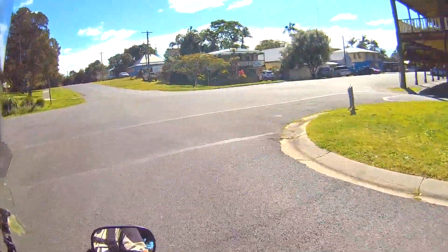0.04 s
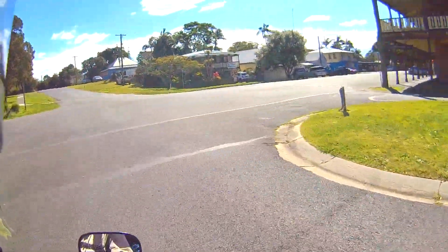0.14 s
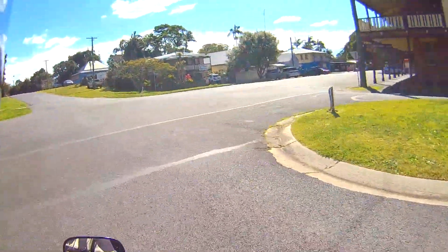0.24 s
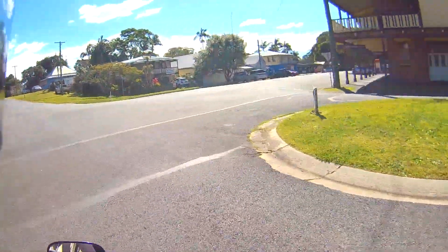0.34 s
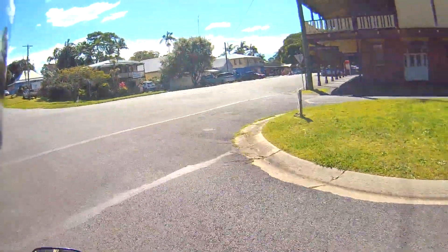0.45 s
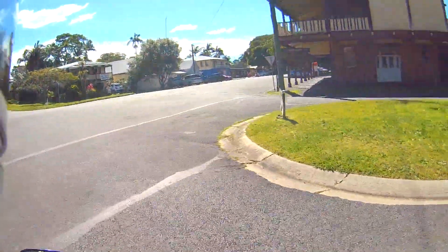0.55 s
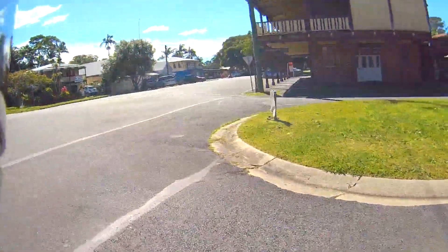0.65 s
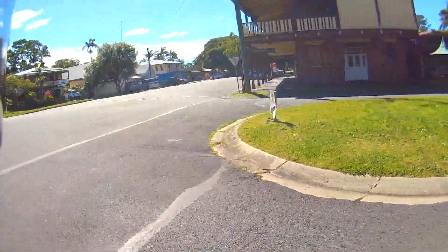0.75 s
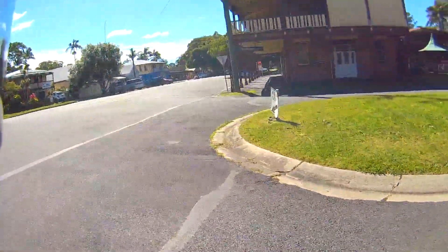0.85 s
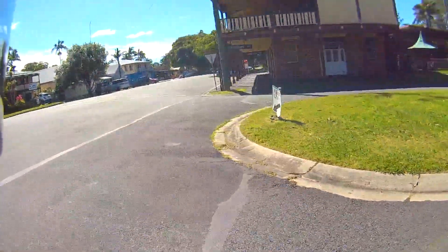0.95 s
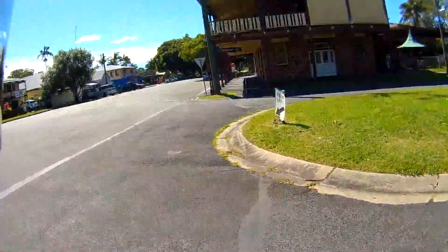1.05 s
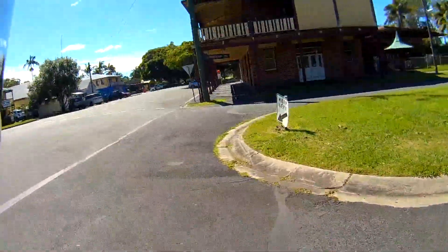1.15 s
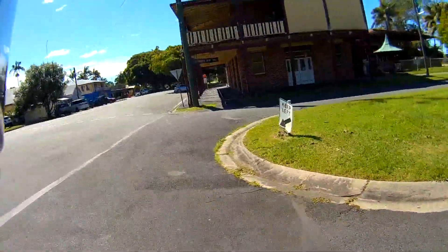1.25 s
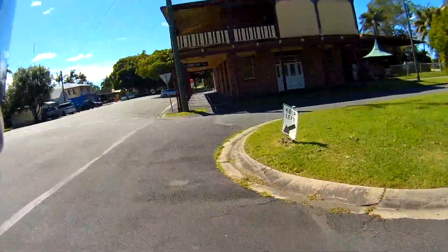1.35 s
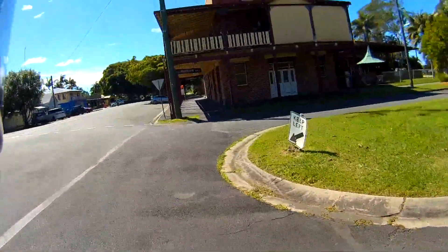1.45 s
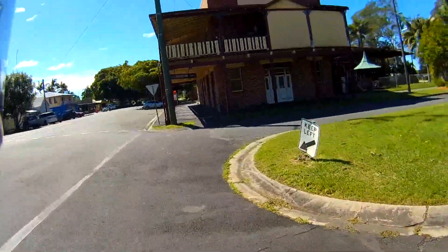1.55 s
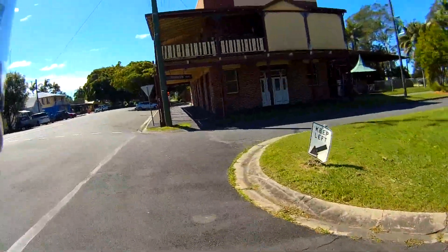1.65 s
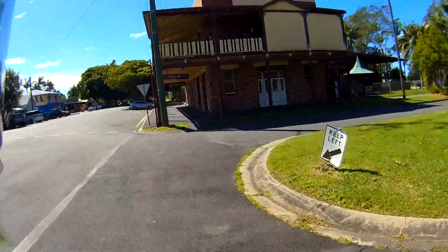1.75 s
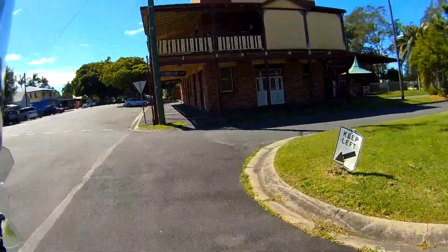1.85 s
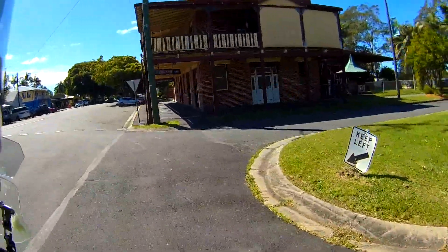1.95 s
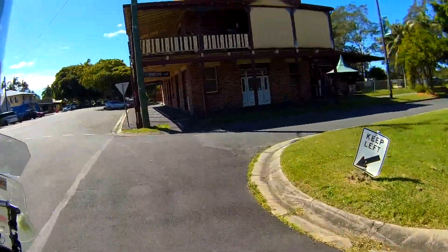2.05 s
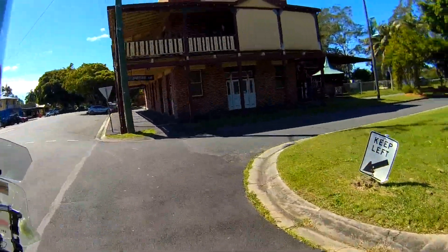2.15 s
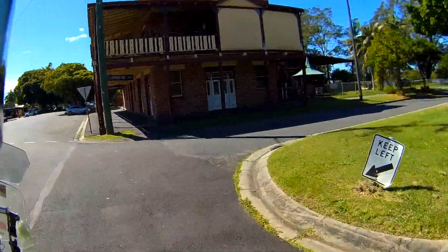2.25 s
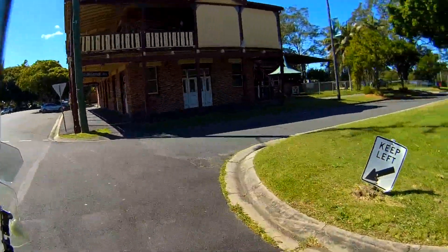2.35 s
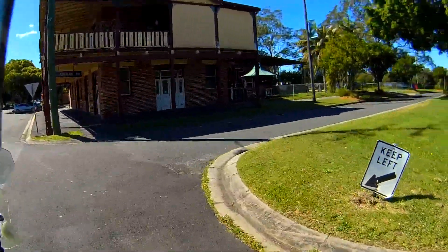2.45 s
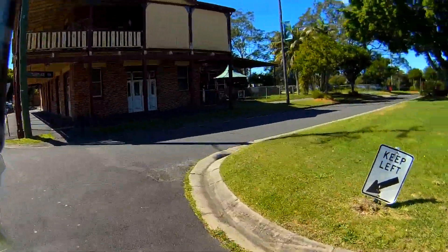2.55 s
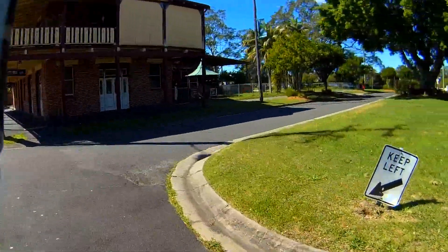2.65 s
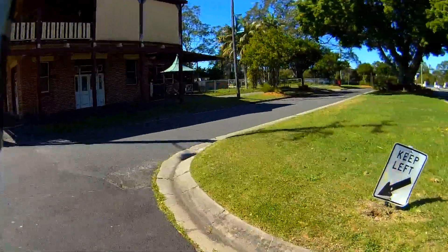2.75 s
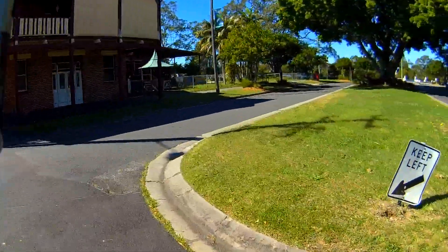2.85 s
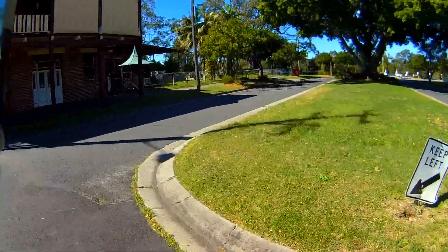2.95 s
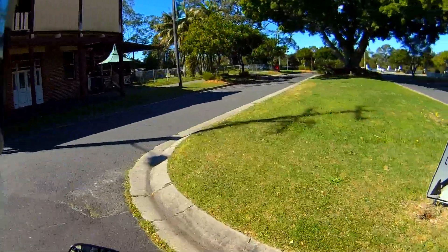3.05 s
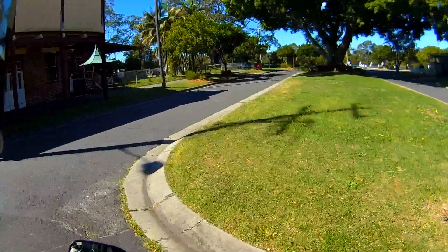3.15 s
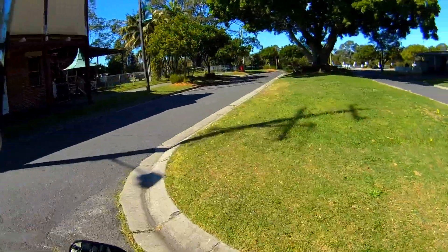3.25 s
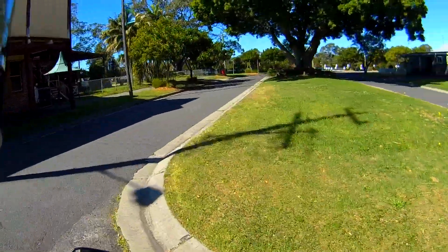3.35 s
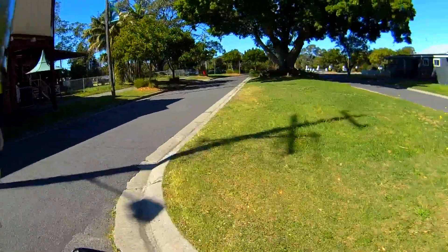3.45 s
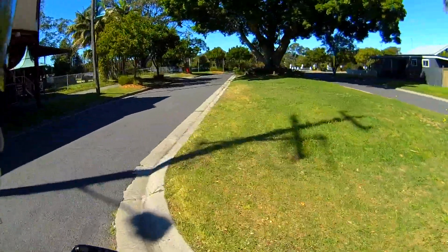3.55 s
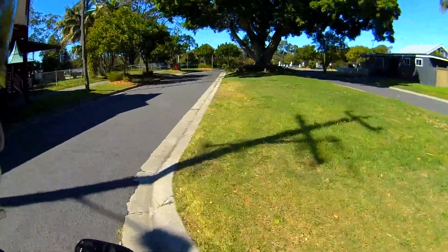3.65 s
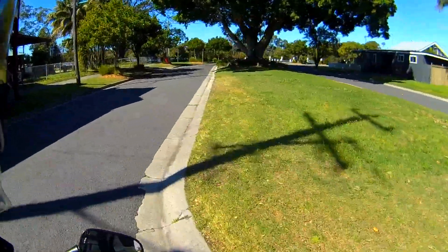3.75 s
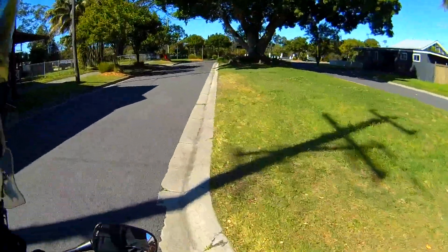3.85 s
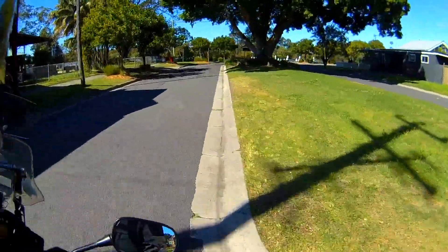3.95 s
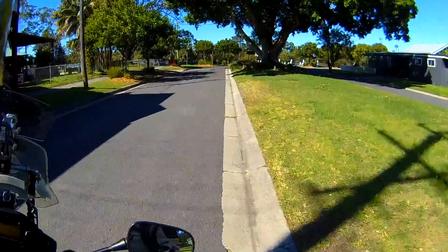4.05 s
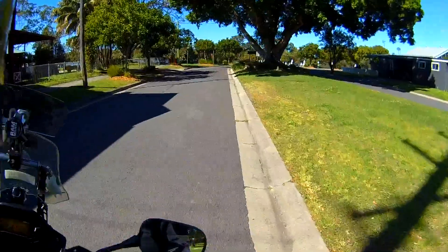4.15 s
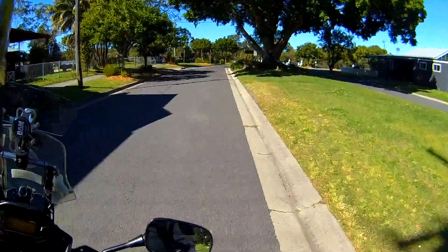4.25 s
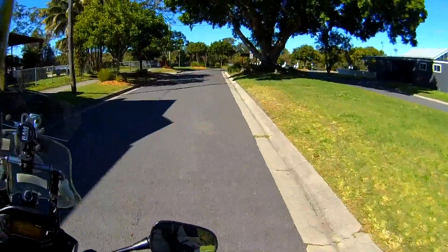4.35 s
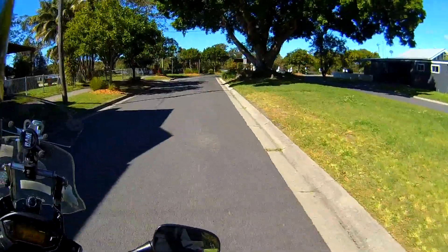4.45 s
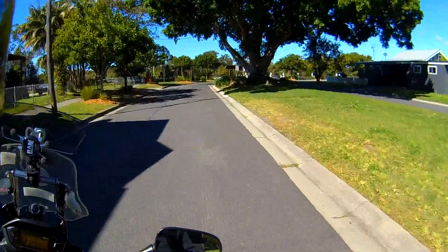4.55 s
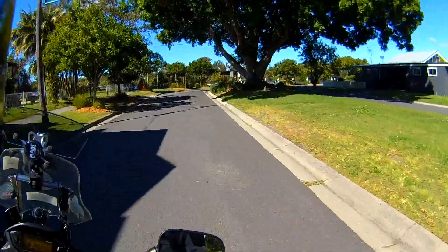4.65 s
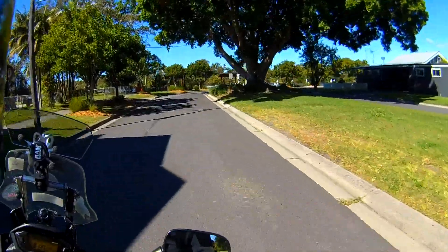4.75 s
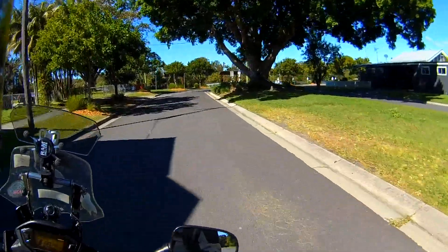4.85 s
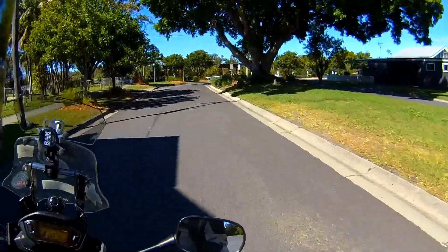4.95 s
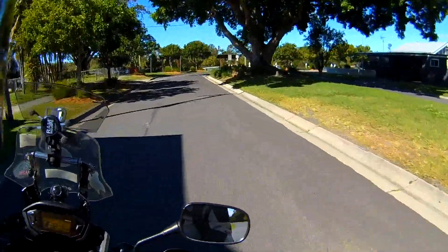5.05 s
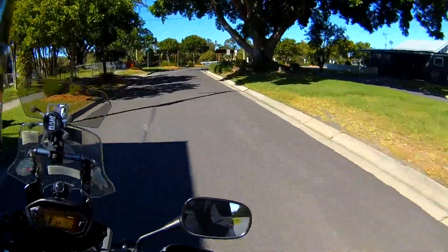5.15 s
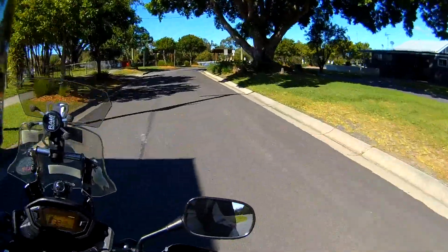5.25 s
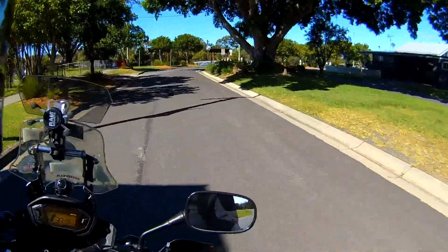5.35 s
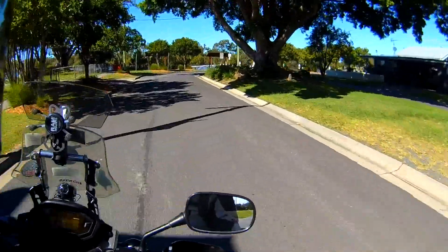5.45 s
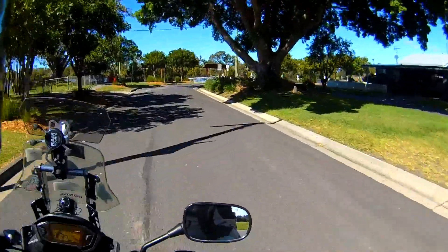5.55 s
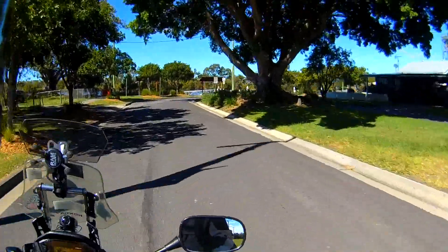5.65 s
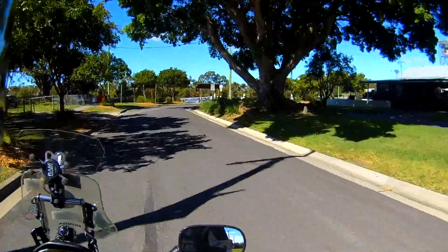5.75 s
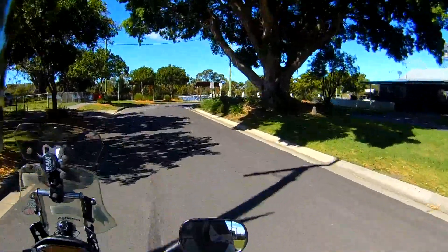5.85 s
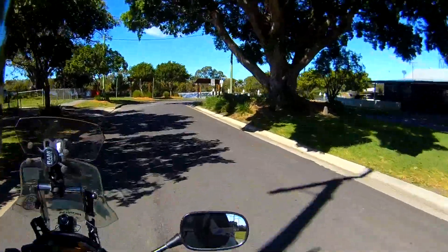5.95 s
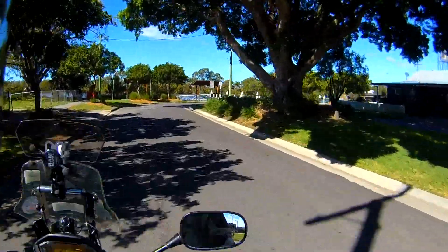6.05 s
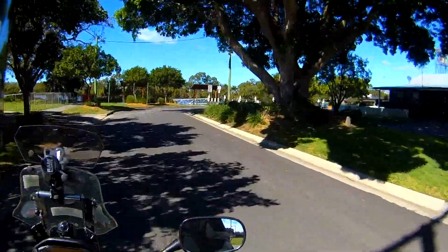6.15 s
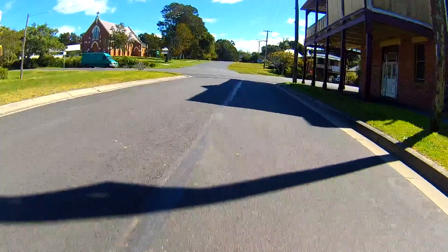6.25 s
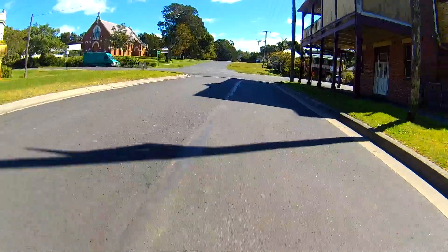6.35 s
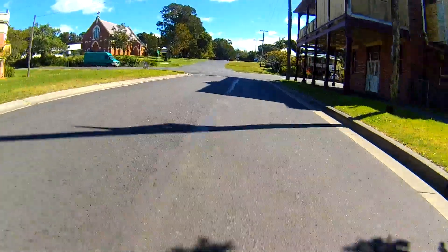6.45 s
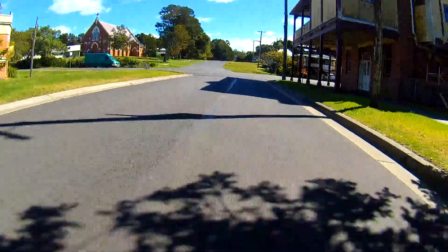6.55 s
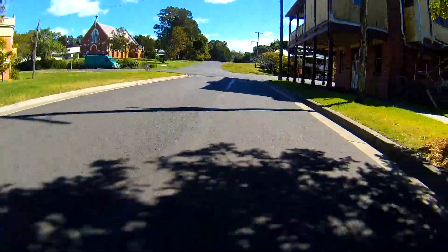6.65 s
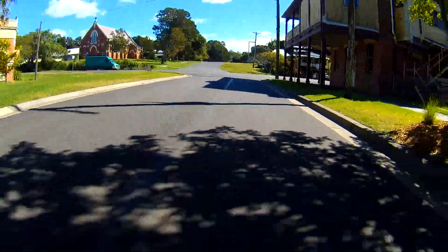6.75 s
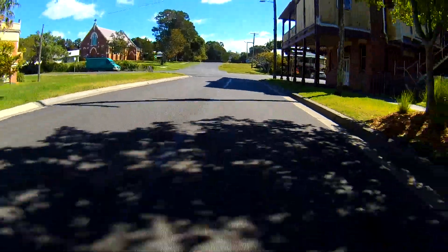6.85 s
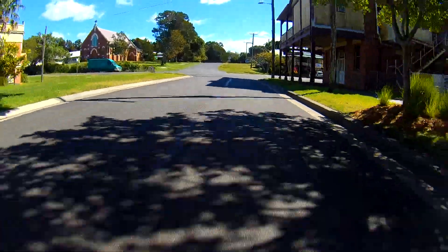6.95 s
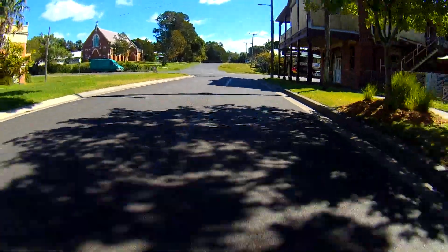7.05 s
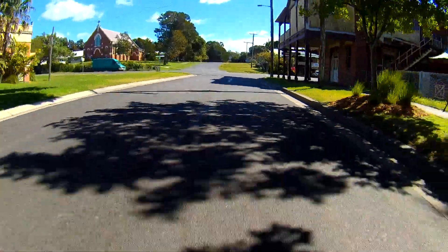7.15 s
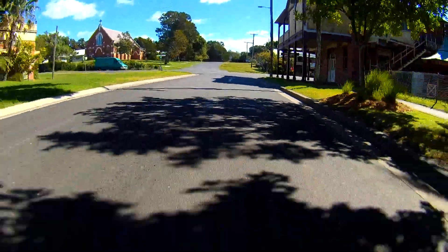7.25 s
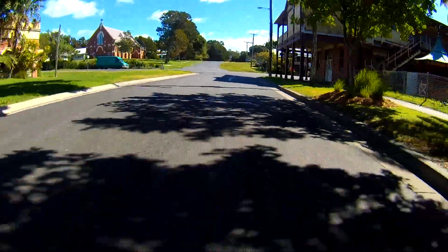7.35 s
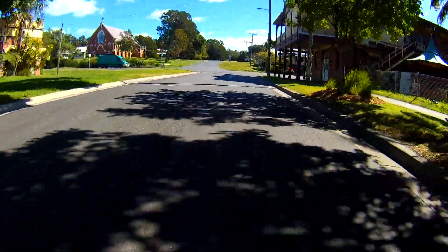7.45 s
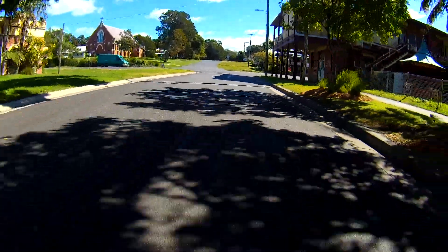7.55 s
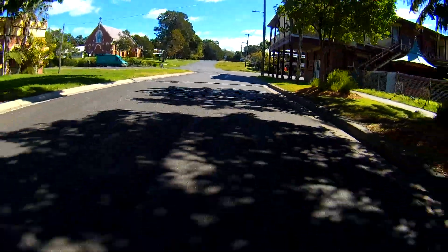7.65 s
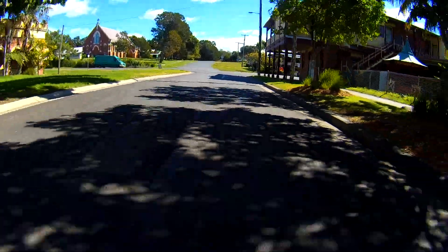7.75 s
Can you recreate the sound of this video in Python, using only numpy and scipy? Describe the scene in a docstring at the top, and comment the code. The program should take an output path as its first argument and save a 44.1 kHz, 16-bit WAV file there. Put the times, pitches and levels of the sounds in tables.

```python
"""A twin-cylinder motorcycle heard from the rider's helmet: it idles round a corner, valves clattering and gears
whining over the wind's rumble; two gulps a quarter cycle apart excite the airbox, silencer and pipe.
It pulls away with a harmonic blare, whistling past the throttle plates, then eases the throttle back.
A cut leads to a second, louder shot, in which it slows: a loose panel buzzes and snaps, and dull thuds follow.
Pulse trains and noise locked to one crank phase pass through resonant bodies; sines make the pure tones."""
import sys
import numpy as np
from scipy import signal
from scipy.fft import rfft, irfft, next_fast_len
from scipy.io import wavfile
from scipy.ndimage import uniform_filter1d, map_coordinates

SR = 44100
rng = np.random.default_rng(int(sys.argv[2]) if len(sys.argv) > 2 else 0)


def wav_record(signal):
    """Record a signal, one row per channel, as 16-bit PCM in the file named by sys.argv[1]."""
    frames = np.transpose(np.atleast_2d(signal))
    bounded = np.clip(frames, -1, 1)
    # unit amplitude maps onto the largest positive 16-bit level
    quanta = np.round(bounded * 32767).astype(np.int16)
    wavfile.write(sys.argv[1], SR, quanta)


N = 343539
TIME = np.arange(N) / SR
CUT_S = 6.29  # the cut to a second, louder shot
REFERENCE_RATE = 20  # four-stroke cycles a second at which speed adds no gain


def amp(db):
    """Level: 20 dB is a tenfold amplitude."""
    return 10 ** (np.asarray(db) / 20)


def unit(x):
    """Normalisation: scale to rms 1."""
    return x / np.sqrt(np.mean(x ** 2) + 1e-20)


def steady(x):
    """Running normalisation: hold the short-term rms near 1 over several engine cycles."""
    power = uniform_filter1d(uniform_filter1d(x ** 2, size=SR // 5), size=SR // 7)
    return x / np.sqrt(np.abs(power) + 1e-6 * np.mean(x ** 2))


def curves(rows, at=TIME):
    """Linear interpolation in time of each column after the first."""
    s, *cols = np.transpose(rows)
    return [np.interp(at, s, c) for c in cols]


def wobble(rate):
    """Band-limited random modulation: a spline through rate random knots a second."""
    knots = rng.standard_normal(int(N * rate / SR) + 4)
    return map_coordinates(knots, [TIME * rate])


def noise():
    """White noise: equal mean power at every frequency."""
    return rng.standard_normal(N)


def impulses(times, sizes):
    """Impulse excitation: one spike at each time."""
    inside = (times > 0) & (times < TIME[-1])
    samples = np.round(times[inside] * SR).astype(int)
    return np.bincount(samples, sizes[inside], N)


def lobe(turn, centre, sharp):
    """Periodic modulation: a smooth bump once per turn, top 1."""
    return np.exp(sharp * (np.cos(2 * np.pi * (turn - centre)) - 1))


def filtered(x, response):
    """Linear filtering: multiply the spectrum by a response of frequency."""
    m = next_fast_len(N + SR // 2)
    return irfft(rfft(x, m) * response(np.fft.rfftfreq(m, 1 / SR)), m)[:N]


def contour(points, hz):
    """Frequency response: gain from (Hz, dB) points, in dB over log frequency."""
    f, db = np.transpose(points)
    return amp(np.interp(np.log(hz + 1), np.log(f), db))


def ring(x, points, size=16384):
    """Minimum-phase resonance: a causal body whose gain follows (Hz, dB) points."""
    hz = np.fft.rfftfreq(size, 1 / SR)
    low_hz, high_hz = points[0][0], points[-1][0]
    gain = contour(points, hz)
    # roll off an octave outside the given points
    gain = gain / np.sqrt(1 + (low_hz / (hz + 1) / 2) ** 4) / (1 + (hz / high_hz / 2) ** 4)
    # folding the cepstrum to positive time gives the causal phase
    cepstrum = irfft(np.log(np.maximum(gain, 1e-6)))
    cepstrum[1:size // 2] *= 2
    cepstrum[size // 2 + 1:] = 0
    return signal.fftconvolve(x, irfft(np.exp(rfft(cepstrum))))[:N]


def resonance(hz, centre_hz, width_hz):
    """Forced resonance: gain of a part shaken near its own pitch, top 1."""
    return 1 / np.sqrt(1 + ((hz - centre_hz) / width_hz) ** 2)


def speed(at=TIME):
    """Rotation rate: four-stroke engine cycles a second, the derivative of the crank phase."""
    # Engine speed. Each row: time in seconds, rate in cycles a second.
    speed_rows = [(0, 20.05), (.2, 16.91), (.7, 15.1), (.9, 15.47), (1.3, 9.24), (1.48, 10.46),
                  (1.7, 18.84), (1.87, 21.15), (2.25, 18.7), (2.88, 17.08), (3.04, 14.7), (3.41, 15.34),
                  (4.18, 18.77), (5.48, 31.83), (5.6, 28.28), (5.77, 30.91), (6.08, 30.4), (6.25, 26.3),
                  (6.48, 28.05), (6.75, 25.85), (7.79, 20.4)]
    return curves(speed_rows, at)[0]


def throttle():
    """Control of air flow: how far the throttle is open, 0-1."""
    # The rider's wrist. Each row: time in seconds, opening from 0 to 1.
    throttle_rows = [(0, 0.47), (.55, 0.34), (.95, 0.17), (1.6, 0.28), (1.9, 0.05), (2.8, 0.15),
                     (3.1, 0.46), (4.1, 0.61), (4.4, 0.92), (5.48, 0.92), (5.57, 0.53), (6.27, 0.52),
                     (6.9, 0.98), (7.6, 0.4)]
    return np.clip(curves(throttle_rows)[0], 0, 1)


def pulling(at=TIME):
    """Load state: 1 while the engine drives the bike, 0 while it idles or coasts."""
    from_s, to_s, clutch_s = 1.5, 5.55, 0.12
    return np.clip(np.minimum(at - from_s, to_s - at) / clutch_s + .5, 0, 1)


def effort(base_db, octave_db, throttle_db, late_db):
    """Source strength: dB add up for each doubling of speed, for throttle and after the cut."""
    speed_db = octave_db * np.log2(speed() / REFERENCE_RATE)
    return amp(base_db + speed_db + throttle_db * throttle() + late_db * (TIME > CUT_S))


def firings(cycle, second_db=4.0):
    """Pulse-train source: two gulps about a quarter cycle apart, then a rest; even under pull, else uneven."""
    gap_pulling, gap_coasting = 0.228, 0.2582  # cycles
    scatter_db, scatter_s = .7, 0.0005
    pull_steadies = .86  # share of the scatter, and of the second gulp's extra dB, lost under pull
    lug_scatter, lug_below_rate = .4, 21.5  # pulling at low revs: share of scatter added, cycles a second
    stumble_spread = 0.008  # a weak pair drifts apart: cycles per dB of drop
    # Stumbles while coasting. Each row: time in seconds, change of strength in dB.
    stumble_rows = [(.11, -4), (.34, -7), (.46, -4), (.79, -4), (1.14, -6), (6.395, -3), (6.54, -3.5),
                    (6.69, -2.5), (6.81, -3.5), (6.847, -4), (6.925, -4.5), (7.04, -3.5), (7.17, -8),
                    (7.3, -7), (7.39, -3.5), (7.575, -5), (7.67, -6)]
    count = np.arange(int(cycle[-1]) + 1)
    at = np.interp(count + 1, cycle, TIME)
    pull = pulling(at)
    # each stumble weakens the cycle nearest in time
    drop = sum(db * (count == np.abs(at - s).argmin()) for s, db in stumble_rows)
    gap = gap_coasting + (gap_pulling - gap_coasting) * pull - stumble_spread * drop
    loose = 1 - pull_steadies * pull
    lug = pull * np.clip((lug_below_rate - speed(at)) / 3, 0, 1)
    train = np.zeros(N)
    for lead, db in ((gap, 0), (0, second_db * loose)):
        times = np.interp(count + .985 - lead, cycle, TIME) - .004
        early, strong = (loose + lug_scatter * lug) * rng.standard_normal((len(count), 2)).T
        train += impulses(times - scatter_s * early, amp(db + scatter_db * strong + drop))
    return train


def gulp(train, points, delay_s=0.00799):
    """Phase-shifted pulse: each spike becomes a smooth suction, a pressure dip and its rebound."""
    def suction(hz):
        return -1j * np.exp(-2j * np.pi * hz * delay_s) * contour(points, hz)
    return filtered(train, suction)


def engine(cycle, breath_db=-23, swell=0.16, swell_sharp=5.8, swell_turn=0.026):
    """Pulse excitation of cavities: gulps thump the airbox, firings ring the pipe and gas rasps in it."""
    # share of hard gulps, 0-1: coasting, pulling, and added by doubled revs
    hard_coasting, hard_pulling, hard_revs = 0.24, 0.47, 0.61
    pull_growl_db, pull_gas_db = 4, -9  # pipe growl under pull; gas rasp under pull at full throttle
    # Strength of the gulps. Each row: time in seconds, level in dB.
    load_rows = [(0, -36), (.5, -38), (.9, -43), (1.45, -40), (1.6, -32), (2.65, -35), (3.15, -30.5),
                 (4.1, -28.5), (4.45, -22.5), (5.5, -22.5), (5.56, -35), (5.63, -24), (6.27, -27.5),
                 (6.32, -18), (7.79, -22.5)]
    # Spectrum of a soft gulp. Each row: frequency in Hz, relative level in dB.
    soft_airbox = [(15, -41), (42, 8), (68, 11), (95, 14), (130, 10), (170, -22), (230, -32.5),
                   (400, -53.5), (900, -100)]
    # Spectrum of a hard gulp. Each row: frequency in Hz, relative level in dB.
    hard_airbox = [(15, -40.5), (45, -15), (72, -15), (110, 14.5), (140, 14), (180, 7.5), (240, -10.5),
                   (400, -50), (900, -100)]
    # Pipe answer to one firing. Each row: frequency in Hz, relative level in dB.
    pipe_body = [(100, -57), (160, 0), (195, 8), (270, 10.5), (350, -8), (420, -10.5), (500, -6.5),
                 (620, -20), (800, -19), (1100, -33), (2500, -63.5)]
    # Gas noise in the pipe. Each row: frequency in Hz, relative level in dB.
    gas_body = [(100, -41.5), (180, 1), (270, -2), (360, -5.5), (480, -13), (650, -30), (1000, -43.5),
                (2500, -69.5)]

    revs = np.clip(speed() / REFERENCE_RATE - 1, 0, 1)
    hard_under_pull = hard_pulling + hard_revs * revs
    hard = np.clip(hard_coasting + pulling() * (hard_under_pull - hard_coasting), 0, 1)
    train = firings(cycle)
    thump = steady(gulp(train * (1 - hard), soft_airbox) + gulp(train * hard, hard_airbox))
    thump = thump + amp(breath_db) * unit(ring(noise(), soft_airbox))
    growl = amp(pull_growl_db * pulling()) * steady(ring(train, pipe_body))
    # turbulence swells while the valves are open, and gives way to clean pulses under pull
    turbulence = noise() * (1 + swell * lobe(cycle, swell_turn, swell_sharp))
    gas = amp(pull_gas_db * pulling() * throttle()) * unit(ring(turbulence, gas_body))
    growl_gain = effort(base_db=-64.0, octave_db=7.5, throttle_db=22.5, late_db=8)
    gas_gain = effort(base_db=-56.0, octave_db=6.5, throttle_db=18.5, late_db=7.0)
    return amp(curves(load_rows)[0]) * thump + growl_gain * growl + gas_gain * gas + silencer(train)


def silencer(train, pull_db=-3):
    """Low-pass radiation: a soft, deep puff with each gulp rounds out the thump."""
    # Deep puff. Each row: frequency in Hz, relative level in dB.
    puff_body = [(15, -20), (32, -5), (52, 8), (70, 5), (95, -8), (140, -21.5), (300, -62), (900, -130)]
    puffs = steady(gulp(train, puff_body, delay_s=.007)) * amp(pull_db * pulling())
    return effort(base_db=-44, octave_db=2.5, throttle_db=-7.5, late_db=5) * puffs


def frame(cycle, early_hz=186, late_hz=204):
    """Forced vibration: crank-locked tones at one, two and eight a cycle, the upper two lifted by resonance."""
    turn = 2 * np.pi * cycle
    first = effort(base_db=-69.5, octave_db=24, throttle_db=7.0, late_db=-0.5) * np.sin(turn)
    second_gain = effort(base_db=-49.5, octave_db=4.5, throttle_db=13.0, late_db=-7.0)
    second = second_gain * resonance(2 * speed(), centre_hz=63, width_hz=0.78) * np.sin(2 * turn)
    drone = amp(1.5 * wobble(15)) * np.sin(8 * turn + .2 * wobble(14))
    frame_hz = np.where(TIME < CUT_S, early_hz, late_hz)
    ringing = resonance(8 * speed(), frame_hz, width_hz=21.6)
    drone_gain = effort(base_db=-42, octave_db=15, throttle_db=4, late_db=7.5)
    return first + second + drone_gain * ringing * drone


def machinery(cycle):
    """Impact and friction noise: valve gear taps four times a cycle over modulated churn and fine hiss."""
    # Engine cases before the cut. Each row: frequency in Hz, relative level in dB.
    early_cases = [(320, -25.5), (550, -3), (691, -6.5), (753, -6), (1010, -11), (1290, -11), (1380, -10),
                   (1950, -19), (2260, -18.5), (2630, -20.5), (3600, -28.5), (4680, -55), (7920, -120)]
    # Engine cases after the cut. Each row: frequency in Hz, relative level in dB.
    late_cases = [(320, -22.5), (550, 2), (736, -12.5), (924, -5), (1070, -12), (1410, -7), (1900, -14.5),
                  (2530, -25), (2960, -21.5), (3600, -28), (4680, -41), (7920, -120)]
    # Fine hiss. Each row: frequency in Hz, relative level in dB.
    hiss_body = [(2600, -19.5), (3600, -9), (4150, -1), (4800, -2.5), (5800, -6), (6500, -7.5), (7300, -13),
                 (9000, -20), (11000, -37.5), (15500, -36.5)]
    times = np.interp(np.arange(0, cycle[-1], 1 / 4), cycle, TIME)
    late_s = .0008 * rng.standard_normal(len(times))
    tap_db = 4.5 * rng.standard_normal(len(times)).clip(-3, 1.7)
    taps = unit(impulses(times + late_s, amp(tap_db)))
    churn = unit(noise() * (2.0 + lobe(cycle, 0.016, 2.6)) * amp(1.1 * wobble(120))) + 0.42 * taps
    cases = np.where(TIME < CUT_S, unit(ring(churn, early_cases)), unit(ring(churn, late_cases)))
    fine = unit(noise() * (2.4 + lobe(cycle, 0.046, 1.9))) + 0.13 * taps
    hiss = unit(ring(fine, hiss_body))
    return (effort(base_db=-67.0, octave_db=7.5, throttle_db=12.5, late_db=4.0) * cases
            + effort(base_db=-73.0, octave_db=5.5, throttle_db=6.0, late_db=-4.5) * hiss)


def gears(cycle, lift=3.2):
    """Tooth-mesh excitation: tones at multiples of the speed, loudest where they meet a ring of the cases."""
    # Gear mesh. Each row: teeth passed per cycle, relative level in dB.
    mesh_rows = [(66.5, -9), (79, -12)]
    whine = np.zeros(N)
    for teeth, db in mesh_rows:
        gain = amp(db) * (1 + lift * resonance(teeth * speed(), centre_hz=850, width_hz=55) ** 2)
        unsteady = 1 + 0.083 * wobble(35)
        whine += gain * unsteady * np.sin(2 * np.pi * teeth * cycle + .85 * wobble(70))
    return effort(base_db=-65.5, octave_db=7.0, throttle_db=-1.5, late_db=3) * whine


def wind():
    """Turbulent pressure: lumpy low rumble of air on the microphone."""
    # Wind on the microphone. Each row: time in seconds, level in dB.
    wind_rows = [(0, -39), (.6, -44), (1.7, -55), (4.4, -55), (5.4, -49), (6.2, -47), (6.6, -34),
                 (7.79, -41)]
    rumble = ring(noise(), [(12, -13.0), (25, -16.0), (50, -5.5), (80, -12), (200, -23.5), (600, -57.0)])
    gusts = amp(wobble(8))
    return amp(curves(wind_rows)[0]) * unit(rumble * gusts)


def crackle(cycle, rate=170):
    """Random impulse noise: tiny bright ticks bunch once a cycle and grow as the throttle opens."""
    # Tick colour. Each row: frequency in Hz, relative level in dB.
    tick_body = [(4000, -20), (7000, -8), (10000, -1), (15000, -16)]
    times = rng.uniform(0, TIME[-1], int(rate * TIME[-1]))
    tick_db = 5 * rng.standard_normal(len(times)).clip(-2, 2)
    ticks = impulses(times, amp(tick_db)) * lobe(cycle, 0, 3)
    return effort(base_db=-106, octave_db=1, throttle_db=25, late_db=-3.5) * unit(ring(ticks, tick_body))


def blows(rows, body, t60):
    """Impact on a resonator: decaying noise rings a body, each blow at its peak level and optional tilt."""
    out = np.zeros(N + SR)
    t = np.arange(SR // 10) / SR
    for s, db, *tilt in rows:
        colour = [(hz, level + sum(tilt) * np.log2(hz / body[0][0])) for hz, level in body]
        hit = ring(rng.standard_normal(len(t)) * amp(-60 * t / t60), colour)
        out[round(s * SR):][:len(hit)] += amp(db) * hit / np.abs(hit).max()
    return out[:N]


def rattles(cycle, buzz_db=-59.5):
    """Impacts and resonance: levers, gearbox and chassis knock; after the cut a panel buzzes and snaps."""
    # Knocks of the levers. Each row: time in seconds, peak level in dB.
    knock_rows = [(.037, -41), (.077, -48), (.477, -46.5), (1.422, -54), (7.589, -44)]
    # Ring of the levers. Each row: frequency in Hz, relative level in dB.
    lever_body = [(250, -20), (500, -3), (850, 0), (1500, -3), (2500, -11), (5000, -25), (9000, -45)]
    # Dull clunk in the gearbox. Each row: time in seconds, peak level in dB.
    clunk_rows = [(5.799, -40.5)]
    # Ring of the gearbox. Each row: frequency in Hz, relative level in dB.
    gearbox_body = [(500, -16), (820, 0), (1150, -7), (2500, -35)]
    # Hardest snaps of the panel. Each row: time in seconds, peak level in dB, treble tilt in dB per octave.
    snap_rows = [(6.3472, -49.5, 4), (6.768, -40, -2), (6.788, -44, -2), (6.7975, -36, -2),
                 (6.8275, -45, 1), (6.8455, -38, -2), (6.8565, -39, -2), (6.8754, -42, 0),
                 (6.8859, -35.5, -2), (6.9054, -38, -1), (6.9158, -38, -1), (6.9248, -37, -1),
                 (6.9358, -36, -2), (6.9657, -39, 0), (6.976, -43, 2), (6.9852, -40, 0), (7.004, -44, 0),
                 (7.0151, -34, -2), (7.055, -47, 4), (7.1603, -33, -2), (7.2122, -41, -3), (7.2485, -45, 5),
                 (7.265, -50, 2), (7.3025, -51, 6), (7.391, -53, 5)]
    # Ring of the panel. Each row: frequency in Hz, relative level in dB.
    panel_body = [(800, -14), (1500, -5), (2300, -1.5), (3100, 3), (4200, 1), (5500, -5), (6800, -10),
                  (8000, -21), (11000, -31), (15000, -42)]
    # Dull thuds as the bike slows. Each row: time in seconds, peak level in dB.
    thud_rows = [(7.262, -26), (7.304, -20), (7.427, -21), (7.515, -27), (7.668, -26)]
    # Ring of the chassis. Each row: frequency in Hz, relative level in dB.
    chassis_body = [(130, -24), (210, -1), (285, 0), (370, -20), (600, -40), (1500, -65)]
    knocks = blows(knock_rows, lever_body, t60=.015)
    clunks = blows(clunk_rows, gearbox_body, t60=.045)
    thuds = blows(thud_rows, chassis_body, t60=.05)
    snaps = blows(snap_rows, panel_body, t60=.011)
    # the buzz peaks as the four-a-cycle shake passes the panel's own pitch
    shaken = (TIME > CUT_S) * resonance(4 * speed(), centre_hz=100.5, width_hz=3.6) ** 2
    buzz = unit(ring(noise() * lobe(4 * cycle, .17, .6) * amp(4 * wobble(260)), panel_body))
    return amp(buzz_db) * shaken * buzz + snaps + knocks + clunks + thuds


def whistle(cycle, fade_s=0.03):
    """Flow tone: air past the throttle plates sings narrow, unsteady glides that pulse once a cycle."""
    # Whistles. Each row: start in seconds, length in seconds, first and last pitch in Hz, level in dB,
    # rate of the random phase wobble in knots a second, which widens the tone.
    whistle_rows = [(.92, .22, 4950, 4200, -83, 90), (2.94, .08, 4220, 4310, -72.5, 30),
                    (3.16, .28, 4100, 4320, -84, 160), (3.42, .26, 4270, 4230, -78, 75),
                    (4.03, .25, 4070, 4100, -73, 80), (4.26, .19, 4080, 4050, -77, 140),
                    (5.02, .56, 3800, 4300, -68.5, 220)]
    out = np.zeros(N)
    for s, length, first_hz, last_hz, db, wobble_rate in whistle_rows:
        pitch_hz = np.interp(TIME, [s, s + length], [first_hz, last_hz])
        angle = 2 * np.pi * np.cumsum(pitch_hz) / SR
        tone = amp(2.5 * wobble(60)) * np.sin(angle + 1.7 * wobble(wobble_rate))
        swell = np.clip(np.minimum(TIME - s, s + length - TIME) / fade_s, 0, 1)
        out += amp(db) * swell * unit(tone * (.25 + lobe(cycle, .95, 1.5)))
    return out


def blare(cycle, turn=.9, t60=0.089):
    """Periodic excitation: under pull, even exhaust blasts sing a stack of harmonics in the pipe."""
    second_gap, second_db = .25, -7  # the second cylinder's blast: delay in cycles, level
    # Pipe's pitched blare. Each row: frequency in Hz, relative level in dB.
    blare_body = [(220, -14), (320, 11), (400, 0), (490, 1.5), (600, -13.5), (730, -15), (900, -22),
                  (1300, -26.5), (2500, -49.5)]
    count = np.arange(int(cycle[-1]))
    blasts = np.zeros(N)
    for lag, db in ((0, 0), (second_gap, second_db)):
        times = np.interp(count + turn + lag, cycle, TIME)
        blasts += impulses(times, np.full(len(count), amp(db)))
    # each blast rings on in the pipe with the same decaying echo
    t = np.arange(SR // 20) / SR
    echo = rng.standard_normal(len(t)) * amp(-60 * t / t60)
    echoes = signal.fftconvolve(blasts, echo)[:N]
    gain = effort(base_db=-63.5, octave_db=11, throttle_db=15, late_db=0) * pulling()
    return gain * steady(ring(echoes, blare_body))


def scene():
    """Superposition: the sources add, and those on the machine share one crank phase."""
    cycle = np.cumsum(speed()) / SR
    mix = engine(cycle) + frame(cycle) + machinery(cycle) + gears(cycle) + wind() + crackle(cycle)
    mix = mix + rattles(cycle) + whistle(cycle) + blare(cycle)
    return mix[None]


def record(dry, top_hz=15650):
    """Band limiting: nothing passes above the top frequency; the ends fade within a few milliseconds."""
    fade = np.clip(np.minimum(TIME, TIME[-1] - TIME) / .004, 0, 1)
    return filtered(dry[0] * fade, lambda hz: hz < top_hz)[None]


dry = scene()
out = record(dry)
wav_record(out)
```